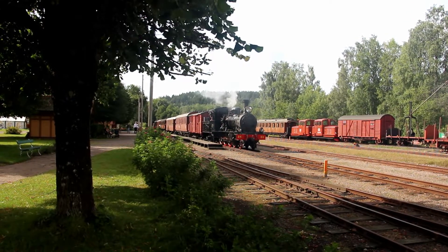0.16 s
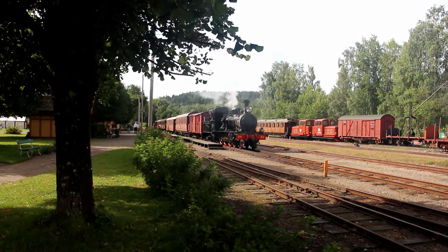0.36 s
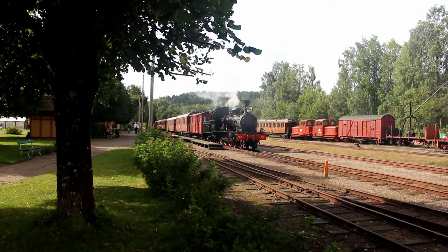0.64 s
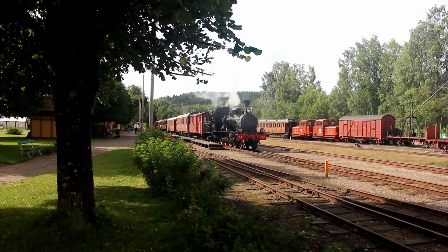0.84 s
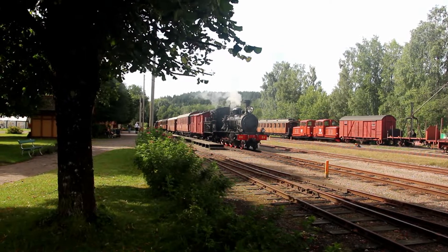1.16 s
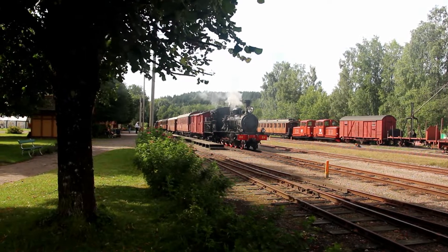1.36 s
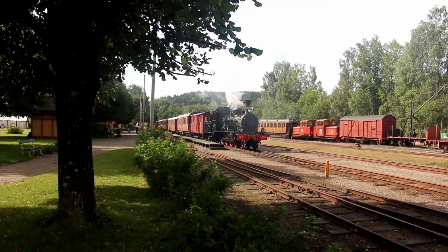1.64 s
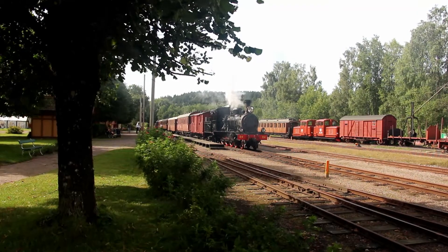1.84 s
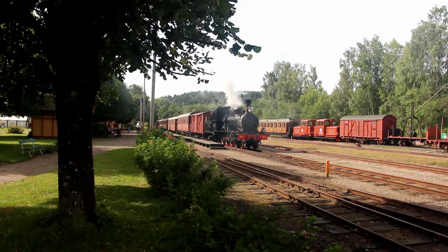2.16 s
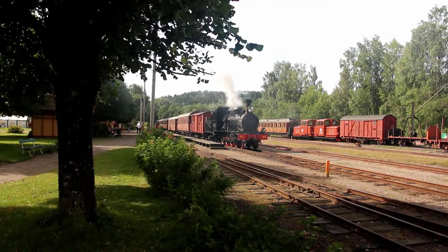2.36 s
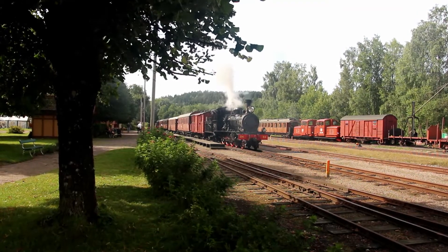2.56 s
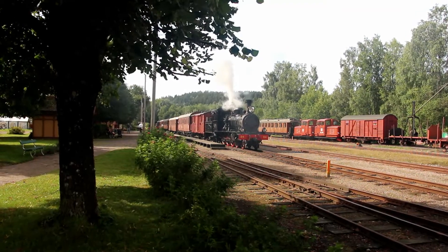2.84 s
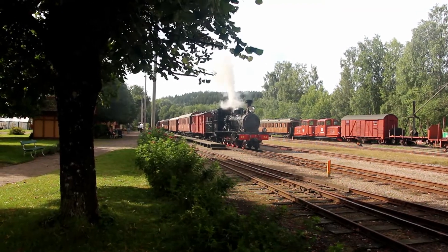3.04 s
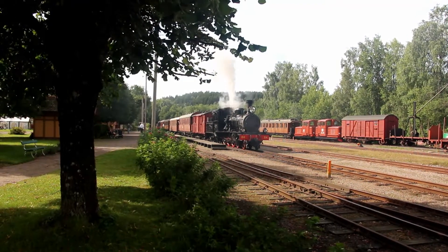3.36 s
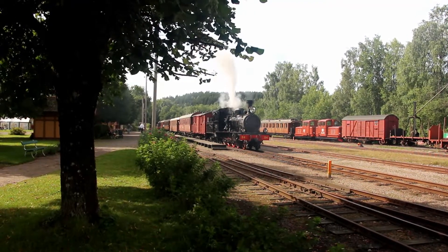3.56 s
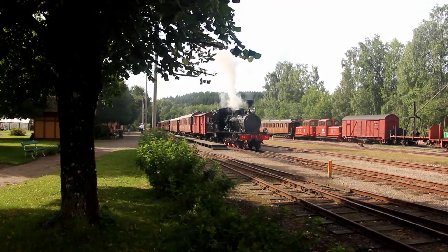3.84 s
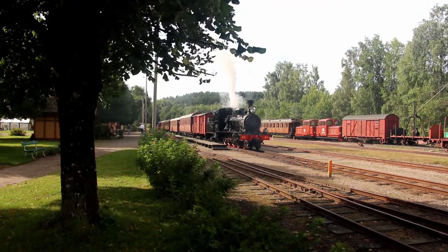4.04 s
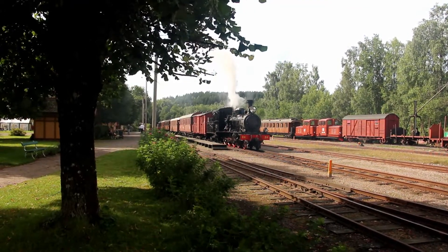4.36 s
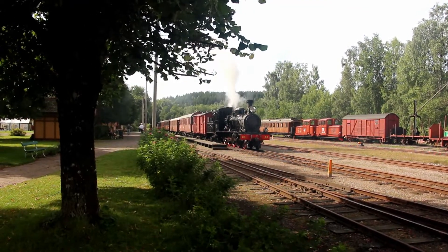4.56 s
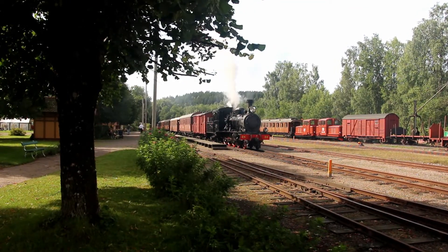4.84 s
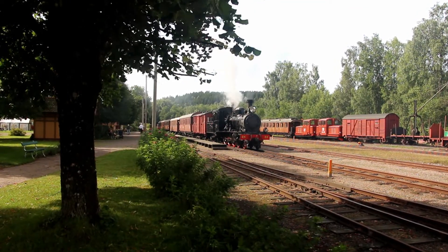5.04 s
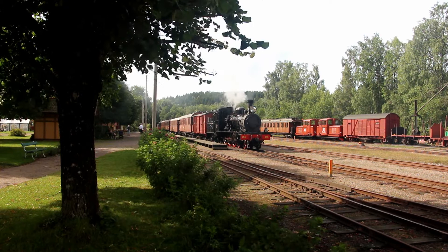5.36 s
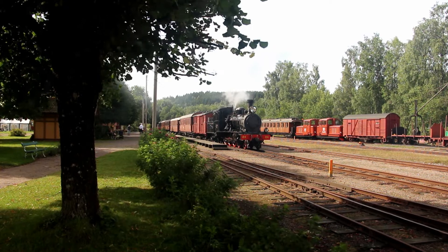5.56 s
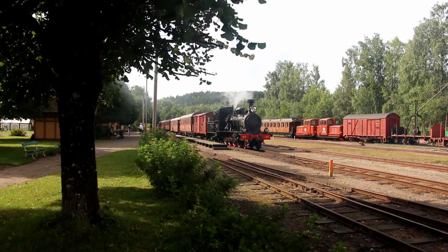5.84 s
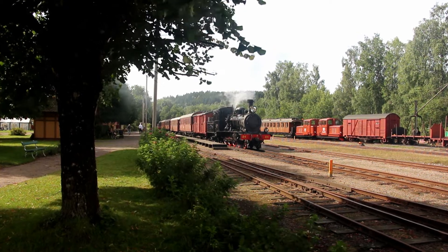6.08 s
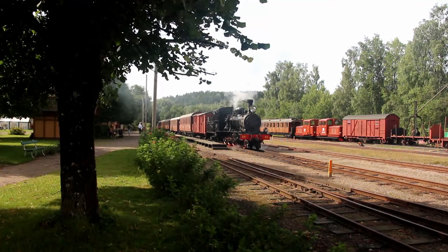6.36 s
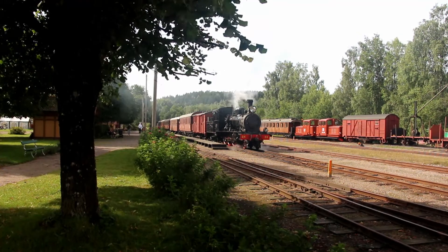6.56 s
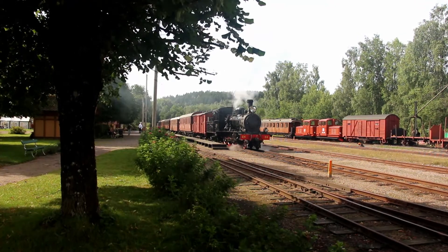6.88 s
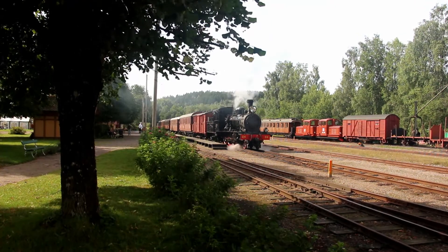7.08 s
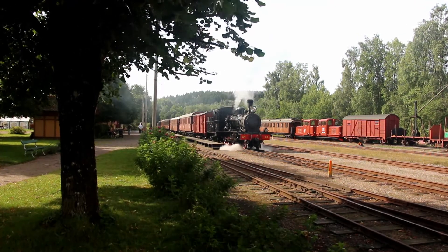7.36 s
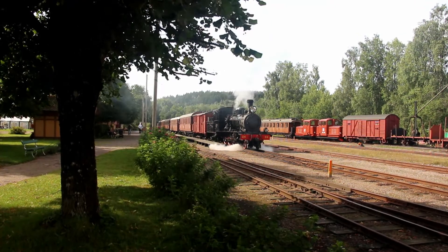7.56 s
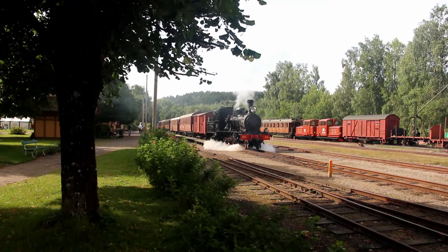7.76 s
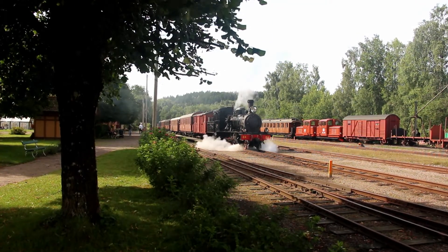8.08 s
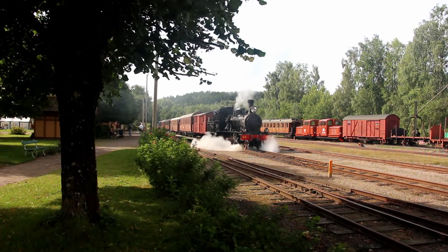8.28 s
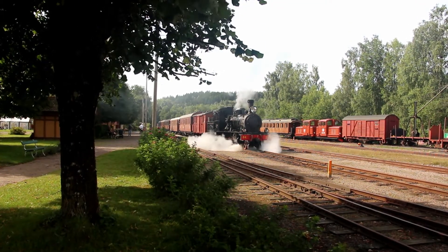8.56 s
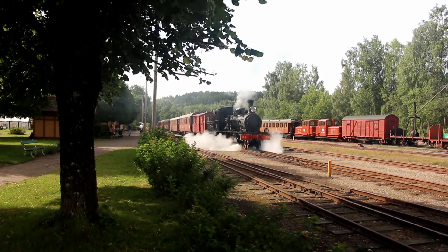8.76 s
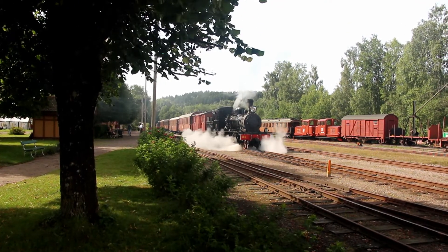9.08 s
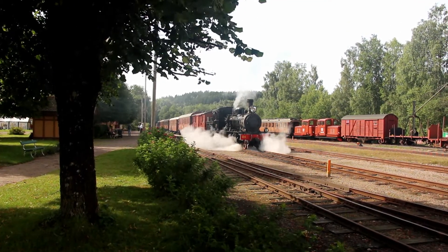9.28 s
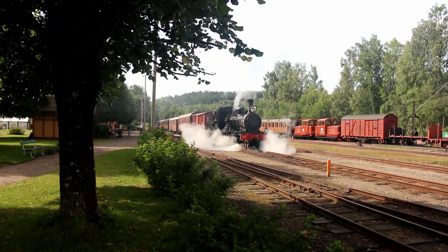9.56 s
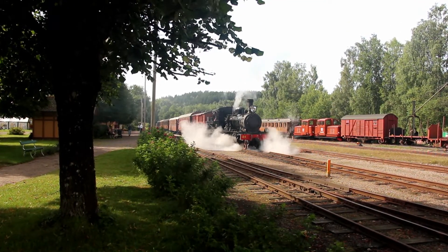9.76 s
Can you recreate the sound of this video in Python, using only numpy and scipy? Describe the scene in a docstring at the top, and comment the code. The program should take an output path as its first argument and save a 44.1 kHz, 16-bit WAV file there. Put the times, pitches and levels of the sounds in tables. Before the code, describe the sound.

A steam locomotive stands in an open, windy yard, heard from some distance and mostly left of centre. From 0 s, grainy hiss runs under heavy low wind buffeting, with the strongest thump near 0.3 s and more gusts through 3.3 s. The hiss dips near 1.8 s. A short whistle toot at 1.6-2.2 s climbs from about 1.1 to 1.3 kHz. After a half-second gap, with hiss swelling briefly, a long blast lasts 2.7-4.9 s around 1.35-1.4 kHz, wet, breathy and broken at first, firmer later, then sagging in pitch. Dull echoes from trees and slopes trail afterward. Hiss is faintest around 5 s, then returns sharply by 5.6 s with wind puffs and a thin, blurred whine near 5.5 kHz. From 6.9 s it turns into brighter cylinder steam, full by 8 s, steady and dense until 9.9 s as the wind fades.

```python
"""A steam locomotive stands across a windy station yard. Shaped noise hisses from its valves, while gusts,
shaped noise in near-opposite phase, buffet the two microphone ports, hardest early on. A whistle of five
unsteady partials gives a short blast, then a long one; trees, wagons and far slopes throw both back
through a noise-built echo. The hiss sinks and returns with a faint whine inside it; from 6.9 s it turns
into the brighter blow of the cylinder cocks."""
import sys
import numpy as np
from scipy import signal
from scipy.fft import rfft, irfft, next_fast_len
from scipy.io import wavfile
from scipy.ndimage import uniform_filter1d, map_coordinates

SR = 44100
rng = np.random.default_rng(int(sys.argv[2]) if len(sys.argv) > 2 else 0)


def wrap_up_sound(samples):
    """Save the sound to the file named by the first command line argument, as 16-bit audio."""
    columns = np.atleast_2d(samples).T
    # keep every value between -1 and 1, then stretch to whole-number steps
    tamed = np.clip(columns, -1, 1)
    steps = np.round(tamed * 32767).astype(np.int16)
    wavfile.write(sys.argv[1], SR, steps)


N = 437014


def amp(db):
    """Amplitude gain for a level in dB; amp(2 * db) is the power gain."""
    return 10 ** (np.asarray(db) / 20)


def power_db(power):
    """Level in dB of a power."""
    return 10 * np.log10(power)


def along(points, hz):
    """Reads (Hz, value) points on a log frequency axis."""
    f, v = np.transpose(points)
    return np.interp(np.log(hz + 1), np.log(f + 1), v)


def curves(rows, t):
    """Reads each column after the time at times t."""
    s, *cols = np.transpose(rows)
    return [np.interp(t, s, c) for c in cols]


def wobble(rate, count=N):
    """A smooth random curve, rate knots a second."""
    knots = rng.standard_normal(int(count * rate / SR) + 4)
    return map_coordinates(knots, [np.arange(count) * rate / SR])


def wobble_at(t, rate):
    """A smooth random curve read at times t."""
    return np.interp(t, np.arange(N) / SR, wobble(rate))


def scatter(depth, rate, count):
    """Random complex part of a tone's strength: it blurs the spectral line."""
    return depth * (wobble(rate, count) + 1j * wobble(rate, count))


def sides(db):
    """Left and right gains for a left-over-right level; their mean is 1."""
    pair = np.array([amp(db / 2), amp(-db / 2)])
    return pair / pair.mean(axis=0)


def leaning(pair, points):
    """Tilts a stereo pair by a left-over-right spectrum."""
    m = next_fast_len(N + 8192)
    gains = sides(along(points, np.fft.rfftfreq(m, 1 / SR)))
    return irfft(rfft(pair, m) * gains, m)[:, :N]


def edge_fade(t, ramp_s):
    """Linear ramps at both ends of a sound."""
    return np.clip(np.minimum(t - t[0], t[-1] - t) / ramp_s, 0, 1)


def rush(shape_db, alike, patchy_db, size):
    """Stereo noise shaped by shape_db(Hz, s), with patches of random gain; alike(Hz) is the correlation."""
    hz, t, z = signal.stft(rng.standard_normal((2, N)), SR, nperseg=size)
    field = uniform_filter1d(rng.standard_normal(z.shape[1:]), size=14, axis=0)
    field = uniform_filter1d(field, size=4, axis=1)
    turn = np.arccos(np.clip(alike(hz), -1, 1))[:, None] / 2
    mid, side = z[0] * np.cos(turn), z[1] * np.sin(turn)
    gain = amp(shape_db(hz[:, None], t) + patchy_db * field / field.std())
    return signal.istft(np.array([mid + side, mid - side]) * gain, SR, nperseg=size)[1][:, :N]


def steam():
    """Jet noise from valves, then cocks; pressure and the turning wind move its bands apart."""
    # band levels: time_s, hiss_db, roar_db, body_db
    steam_levels = [(0.0, -31.5, -35, -29), (0.05, -32, -30, -31), (0.19, -34, -33.5, -31),
                    (0.3, -36, -30.5, -29), (0.5, -38, -34.5, -36.5), (0.91, -36, -33, -32.5),
                    (1.1, -38, -35, -32), (1.13, -37.5, -36, -35.5), (1.43, -36, -33, -30.5),
                    (1.49, -40.5, -34.5, -38), (1.82, -48, -45, -40.5), (2.18, -43.5, -39, -39.5),
                    (2.79, -35, -32.5, -33), (3.04, -40.5, -36.5, -40), (3.45, -37.5, -36, -35.5),
                    (3.92, -47.5, -42.5, -47), (4.0, -41.5, -39, -42), (4.61, -43.5, -45.5, -46),
                    (4.72, -47, -50, -47), (4.99, -52, -45, -45.5), (5.6, -37, -38, -35),
                    (6.12, -34, -31, -29.5), (7.17, -32, -31.5, -29), (8.14, -31.5, -38.5, -32.5),
                    (9.85, -32, -37.5, -31), (9.91, -31.5, -37, -34)]
    # treble band level: time_s, treble_db
    treble_levels = [(0.0, -36), (0.27, -33.5), (0.38, -40.5), (0.77, -40), (0.85, -35), (1.43, -37.5),
                     (1.54, -44), (1.6, -41), (1.76, -51), (2.12, -43), (2.43, -46.5), (2.7, -30.5),
                     (2.87, -41), (2.95, -38.5), (3.06, -43.5), (3.23, -42), (3.28, -45), (3.5, -40),
                     (3.59, -44.5), (3.92, -49.5), (3.97, -47.5), (4.39, -44.5), (4.83, -54.5),
                     (5.05, -52.5), (5.66, -35.5), (5.68, -37.5), (5.91, -33), (5.96, -36.5), (6.57, -32),
                     (6.76, -33.5), (6.85, -38), (7.04, -33), (7.45, -29.5), (8.36, -27.5), (9.08, -29.5),
                     (9.91, -29.5)]
    # band edges, rows roar, body, hiss, treble: low_hz, high_hz
    bands_hz = [(600, 1000), (1800, 2250), (2950, 3500), (7500, 14000)]
    # valve jet spectrum: freq_hz, relative_db_per_hz
    valve_jet = [(210, -35), (350, -21), (513, -20), (776, -5.5), (1140, -15.5), (1360, -10.5), (1990, -5),
                 (2260, -10), (3700, -6.5), (4140, -7.5), (8800, -13.5), (11100, -15), (14600, -22.5),
                 (15800, -28)]
    # cylinder cock jet spectrum: freq_hz, relative_db_per_hz
    cock_jet = [(71, -47), (120, -15), (235, -13), (491, -22.5), (769, -11), (905, -14.5), (1000, -16),
                (1130, -10.5), (1570, -10), (2010, -4.5), (2320, -6), (3630, -0.5), (4800, -5.5),
                (8900, -10.5), (14200, -18), (15800, -27)]
    # narrow bands added to the jet: centre_hz, width_hz, valves_over_jet_db, cocks_over_jet_db
    ridges = [(581, 35, 9, 4), (763, 59, 10, 8), (910, 47, 8.5, 11.5), (1126.3, 17, 21.5, 18),
              (1296, 28, 8, 9.5), (1685, 8.7, 9.5, 3), (1913, 37, 8, 8), (2054, 50, 10, 10.5),
              (2230, 170, -10, -2.5), (2540, 56, 6, 3.5), (2716, 53, 11.5, 5), (2882, 29, 9.5, 6.5),
              (3084, 27, 7.5, 6.5), (2970, 34, -5, -25), (3675, 145, 7, -4.5), (4000, 220, -3, 0),
              (4570, 116, 0.5, 4), (5000, 160, -5.5, -4), (5610, 78, 5.5, 2), (6970, 3100, 0, 0),
              (7400, 280, 2.5, -9)]
    # opening of the cocks: time_s, cocks_share (0-1)
    opening = [(6.9, 0), (7.4, .5), (8.0, 1)]
    # left-right correlation: freq_hz, correlation
    likeness = [(200, .4), (450, .7), (700, .95), (1300, .94), (2400, .88), (4400, .76), (8100, .6),
                (15000, .5)]
    # stereo tilt: freq_hz, left_over_right_db
    lean = [(400, 7), (700, 7.5), (1300, 4), (8000, 5), (15000, 4)]

    def jet_colour(jet, column, hz):
        """The jet's broad spectrum and its ridges."""
        added = sum(amp(2 * r[column]) / (1 + (2 * (hz - r[0]) / r[1]) ** 2) for r in ridges)
        return along(jet, hz) + power_db(1 + added)

    def shape_db(hz, t):
        """Spectrum over time: colour set to the band levels, with flicker."""
        hiss_db, roar_db, body_db = curves(steam_levels, t)
        treble_db, = curves(treble_levels, t)
        share = np.clip(curves(opening, t)[0], 0, 1)
        colour = (1 - share) * jet_colour(valve_jet, 2, hz) + share * jet_colour(cock_jet, 3, hz)

        # each correction fades out towards the neighbouring band centres
        log_centres = np.log(np.prod(bands_hz, axis=1)) / 2
        place = np.interp(np.log(hz + 1), log_centres, np.arange(len(bands_hz)))
        lift = 0
        for k, (db, (lo, hi)) in enumerate(zip([roar_db, body_db, hiss_db, treble_db], bands_hz)):
            inside = (hz[:, 0] > lo) & (hz[:, 0] < hi)
            power = amp(2 * colour[inside]).sum(axis=0) / len(hz)
            lift = lift + np.clip(1 - abs(place - k), 0, 1) * (db - power_db(power))

        # the treble scatters most on the long path
        flicker = 1.1 * wobble_at(t, 15) / (1 + (9000 / (hz + 1)) ** 4)
        flicker = flicker + 3.2 * wobble_at(t, 6.6) / (1 + (12000 / (hz + 1)) ** 8)
        swell = (1 - share) * 0.45 * wobble_at(t, 4)  # the cocks blow evenly
        return colour + lift + flicker + swell

    jets = rush(shape_db, lambda hz: along(likeness, hz), patchy_db=1.13, size=2048)
    # turbulence on the path makes the whole hiss flicker a little
    return leaning(jets * amp(0.26 * wobble(9)), lean)


def wind():
    """Eddies push on one port as they pull on the other, in lumps; gusts swell over a slower wind."""
    # wind under the gusts: time_s, buffet_db, flutter_over_buffet_db, deep_over_buffet_db
    wind_levels = [(0, -23, -23, -3), (.4, -21.5, 8, -5), (.9, -22.5, -11, 1), (1.3, -24, -14, 3),
                   (1.61, -22, 9, -8), (1.66, -25.5, -1.5, -16), (1.95, -27, -4, -6), (2.06, -31, -15, -6),
                   (2.15, -29, 3, -5), (2.9, -35, -9, -5), (3.03, -40, -16, 0), (3.1, -28, -7, -2),
                   (3.55, -29.5, 0, 0), (3.8, -42.5, -8, 0), (4.3, -34.5, -18, 2), (4.7, -58, -4, 0),
                   (5.1, -49, -11, 10), (5.35, -27.5, -10, 0), (6.1, -40.5, -14, 0), (6.7, -43, -13, 13),
                   (7.3, -36, -13, -9), (7.9, -37, -23, 11), (8.3, -56, -9, 14), (9.0, -53, -8, 8),
                   (9.6, -48, -18, 13), (9.91, -56, -8, 9)]
    # gusts: peak_s, peak_db, length_s, flutter_over_buffet_db
    gusts = [(0.324, -13, 0.045, -8), (0.53, -19, 0.12, 1), (0.79, -23, 0.053, 1.5),
             (1.034, -21.5, 0.15, 4), (1.22, -25, 0.11, -4), (1.463, -15.5, 0.22, -4.5),
             (2.3, -19, 0.17, 3), (2.574, -17, 0.077, 1), (2.75, -22.5, .13, -10), (2.935, -23, 0.04, -2),
             (3.157, -25.5, 0.091, -8), (3.33, -21.5, 0.14, -1), (4.137, -37, 0.13, -3),
             (5.45, -24.5, 0.061, -3), (5.6, -27, 0.089, -17), (5.829, -25.5, 0.11, -10),
             (6.03, -32, 0.062, -11), (6.313, -36, 0.083, -5), (6.54, -26.5, 0.072, -16),
             (6.797, -27, 0.093, -8), (7.033, -28, 0.065, -15), (7.25, -31.5, .2, -6.5),
             (7.553, -31, .2, -28), (7.766, -33, 0.13, -10), (8.81, -40, 0.086, -14), (9.5, -41, 0.27, -22)]
    # buffet spectrum: freq_hz, relative_db_per_hz
    buffet_spectrum = [(12, -55), (20, -59), (65, 7), (108, 5.5), (211, 4), (249, 0), (299, -3),
                       (406, -10.5), (560, -16), (730, -39), (1230, -120)]
    # how the wind favours a port: freq_hz, left_over_right_db
    ports = [(40, -0.5), (130, 3), (330, -7.5)]

    def shape_db(hz, t):
        """Spectrum over time: deep rumble, buffet and, above about 230 Hz, flutter."""
        buffet_db, flutter_db, deep_db = curves(wind_levels, t)
        low_power = amp(2 * buffet_db)
        high_power = amp(2 * (buffet_db + flutter_db))
        for s, db, length_s, over_db in gusts:
            swell = amp(2 * db) * np.exp(-(2 * (t - s) / length_s) ** 2)
            low_power = low_power + swell
            high_power = high_power + swell * amp(2 * over_db)
        # the flutter comes in short spikes
        high_power = high_power * amp(2 * 2.7 * wobble_at(t, 22))

        colour = along(buffet_spectrum, hz)
        colour = colour - power_db(np.mean(amp(2 * colour)))
        deep = deep_db / (1 + ((hz + 1) / 70) ** 4)
        flutter = power_db(high_power / low_power) / (1 + (230 / (hz + 1)) ** 4)
        return colour + deep + power_db(low_power) + flutter

    shared_db = 1.2 * wobble(17) + 0.93 * wobble(45)
    port_db = 2.12 * np.array([wobble(50), wobble(50)])
    push = rush(shape_db, lambda hz: -.75 + 0 * hz, patchy_db=2.57, size=768)
    highpass = signal.butter(3, 52, "high", fs=SR, output="sos")
    return amp(shared_db + port_db) * signal.sosfilt(highpass, leaning(push, ports))


def whistle():
    """A blown bell: five partials, each fading on its own in turbulent air, with a band of breathy steam."""
    # fundamental, one list a blast: time_s, level_db
    blast_levels = [
        [(1.56, -56), (1.59, -20), (1.63, -14.5), (1.8, -13.5), (1.96, -20), (2.13, -20), (2.17, -47)],
        [(2.69, -41), (2.74, -26), (2.82, -19.5), (3.05, -17.5), (3.3, -21.5), (3.6, -20.5), (3.7, -15.5),
         (3.95, -17), (4.2, -15.5), (4.45, -18), (4.6, -18.5), (4.81, -21), (4.87, -41)],
    ]
    # fundamental: time_s, pitch_hz
    pitch_track = [(1.57, 1062), (1.65, 1139), (1.75, 1149), (1.9, 1195), (2.05, 1208), (2.15, 1273),
                   (2.7, 1414), (2.85, 1350), (3.1, 1330), (3.3, 1370), (3.6, 1349), (3.75, 1387),
                   (4.0, 1387), (4.2, 1406), (4.47, 1415), (4.5, 1362), (4.6, 1286), (4.75, 1139),
                   (4.82, 1140), (4.87, 1020)]
    # wet steam breaks the tone up: time_s, roughness (0-1), breath_db, overtone_gain_db
    wetness = [(1.56, 0.15, -52, -10), (1.85, 0.03, -54, -4), (1.96, 0.17, -49, 4.5),
               (2.17, 0.15, -40, -12), (2.68, 0.45, -30, -12), (3.0, 0.46, -39, 5.5),
               (3.25, 0.3, -34.5, -5), (3.5, 0.28, -33, 8.5), (3.8, 0.2, -39.5, -1.5),
               (4.4, 0.29, -39, 0.5), (4.47, 0.15, -45, 1.5), (4.52, 0.23, -46, -3), (4.7, 0, -57, 1),
               (4.87, 0.13, -58, -18)]
    # brief dips of the fundamental: centre_s, depth_db, width_s
    dips = [(1.776, 4, .015), (1.834, 9, .012), (2.061, 25, 0.004), (2.087, 20, 0.0049), (2.8, 15, 0.018),
            (2.831, 14, 0.0049), (2.852, 12, 0.0061), (2.891, 23, 0.033), (2.93, 17, 0.011),
            (2.987, 21, .026), (3.12, 25, 0.066), (3.152, 15, 0.0084), (3.182, 27, .012), (3.2, 12, 0.0069),
            (3.25, 8, 0.029), (3.319, 21, .015), (3.352, 26, .017), (3.393, 25, 0.022), (3.446, 13, 0.0084),
            (3.5, 28, 0.044), (3.657, 22, .03), (3.741, 22, 0.013), (3.768, 28, 0.011), (3.794, 13, 0.01),
            (3.956, 9, .015), (3.996, 11, 0.047), (4.093, 12, .015), (4.365, 8.5, 0.11), (4.521, 20, 0.035),
            (4.562, 17, 0.062), (4.702, 12, 0.007)]
    # 2nd to 5th partial: full_pitch_db, loss_db_per_100_hz below full pitch
    overtones = [(-39.5, 1.5), (-35.5, 6.5), (-40, 16.5), (-58, 20)]
    full_pressure_hz = 1424
    lean_db, sway_db, sway_rate = 6, 2.5, 7.4  # left over right; its sway, knots a second
    drift_db, drift_rate = 2.5, 11.81  # slow swell of each overtone, knots a second
    breath_band = signal.butter(2, [1380, 1750], "band", fs=SR, output="sos")

    out = np.zeros((2, N))
    for rows in blast_levels:
        span = slice(round(rows[0][0] * SR), round(rows[-1][0] * SR))
        t = np.arange(N)[span] / SR
        count = len(t)
        pitch_hz, = curves(pitch_track, t)
        rough, breath_db, shrill_db = curves(wetness, t)
        tone_db, = curves(rows, t)
        phase = 2 * np.pi * np.cumsum(pitch_hz * (1 + 0.002 * wobble(30.48, count))) / SR

        dip_gain = np.ones(count)
        for s, depth_db, width_s in dips:
            dip_gain *= 1 - (1 - amp(-depth_db)) * np.exp(-((t - s) / (width_s / 2)) ** 2)

        breath = signal.sosfilt(breath_band, rng.standard_normal(count))
        blast = amp(breath_db) * breath / breath.std()

        slack = (full_pressure_hz - pitch_hz) / 100
        gains = [amp(tone_db) * dip_gain]
        for full_db, loss_db in overtones:
            drift = drift_db * wobble(drift_rate, count)
            gains.append(amp(full_db + shrill_db - loss_db * slack + drift))

        for k, gain in enumerate(gains):
            # overtones scatter more, and faster the higher they are
            slow = scatter(rough + 0.47 * (k > 0), 40 + 15 * k, count)
            fast = scatter(.5 * rough, 260, count)
            partial = np.imag((1 + slow + fast) * np.exp(1j * (k + 1) * phase))
            blast = blast + np.sqrt(2) * gain * partial

        lean = sides(lean_db + sway_db * wobble(sway_rate, count))
        out[:, span] = blast * lean * edge_fade(t, 0.0087)
    return out


def valley(x):
    """A diffuse tail from trees and wagons, and a few smeared echoes from far slopes; all dull."""
    # far slopes: delay_s, level_db (before the lowpass), smear_s
    echoes = [(.1, -7, 0.074), (.3, -15.5, 0.22), (.66, -19.5, 0.043), (.84, -23, 0.0099),
              (1.1, -22.5, 0.097), (1.4, -29, 0.24), (1.82, -27.5, 0.015)]
    # gain undone before the echoes and reapplied after them: time_s, gain_db
    gain_curve = [(1.6, 5), (1.8, -7), (2.1, -8), (2.4, -5), (2.7, -4), (3, -4), (3.7, 5.5), (4.5, -16),
                  (4.9, -9), (5.4, -6), (5.9, -1.5), (6.4, 0.5)]
    t = np.arange(int(2.4 * SR)) / SR
    tail = amp(-60 * t / 2.2) * (1 - np.exp(-t / 0.085))  # 60 dB decay in 2.2 s
    power = amp(2 * -9) * tail ** 2 / np.sum(tail ** 2)
    for delay_s, db, smear_s in echoes:
        lump = np.exp(-((t - delay_s) / smear_s) ** 2)
        power += amp(2 * db) * lump / lump.sum()

    a, b = rng.standard_normal((2, len(t))) * np.sqrt(power)
    response = np.array([a, 0.46 * a + 0.39 * b])
    # each echo is scaled by the gain at its arrival over that at its departure
    gain = amp(curves(gain_curve, np.arange(N) / SR)[0])
    wet = signal.fftconvolve((x.mean(axis=0) / gain)[None], response, axes=1)[:, :N]
    return gain * signal.sosfilt(signal.butter(1, 3500, fs=SR, output="sos"), wet)


def whine():
    """A faint tone blurred by fast random scatter into a narrow band inside the returning hiss."""
    # whine: time_s, pitch_hz, gain_db (on the scattered tone)
    whine_track = [(5.5, 5570, -44), (6.0, 5500, -34), (6.5, 5560, -34), (7.0, 5100, -36), (7.5, 6200, -46)]
    span = slice(round(whine_track[0][0] * SR), round(whine_track[-1][0] * SR))
    t, out = np.arange(N)[span] / SR, np.zeros(N)
    pitch_hz, db = curves(whine_track, t)
    phase = 2 * np.pi * np.cumsum(pitch_hz) / SR
    tone = np.imag(scatter(0.76, 300, len(t)) * np.exp(1j * phase))
    out[span] = amp(db) * tone * edge_fade(t, 0.14)
    return out * sides(np.array([5.1]))  # left over right, dB


def scene():
    """Steam, wind, whistle with its echoes, and whine, summed."""
    blasts = whistle()
    return steam() + wind() + blasts + valley(blasts) + whine()


def record(dry):
    """Adds a treble copy about a millisecond late; nothing passes above the band limit."""
    top_hz, bounce_gain, delay_s = 15750, .3, 1 / 880
    m = next_fast_len(N + 8192)
    hz = np.fft.rfftfreq(m, 1 / SR)
    treble_band = 1 / (1 + (6200 / (hz + 1)) ** 8) / (1 + (hz / 13000) ** 8)
    bounce = bounce_gain * treble_band * np.exp(-2j * np.pi * hz * delay_s)
    return irfft(rfft(dry, m) * (1 + bounce) * (hz < top_hz), m)[:, :N]


dry = scene()
out = record(dry)
wrap_up_sound(out)
```